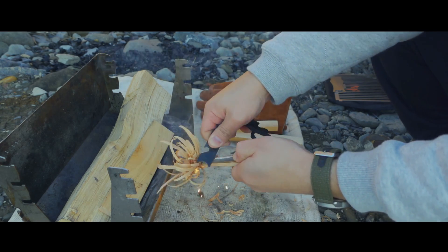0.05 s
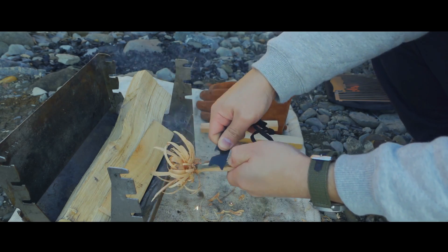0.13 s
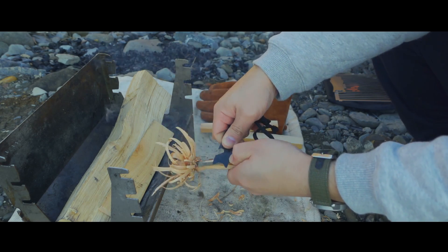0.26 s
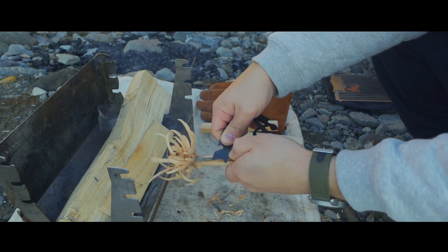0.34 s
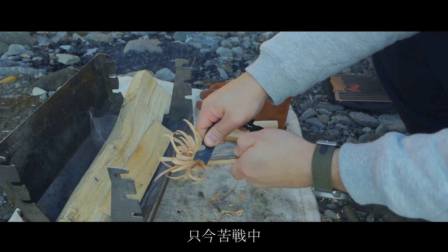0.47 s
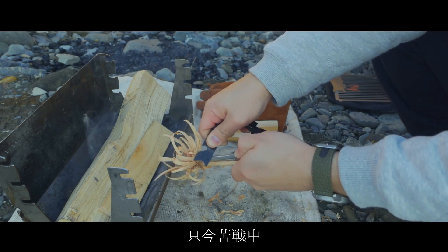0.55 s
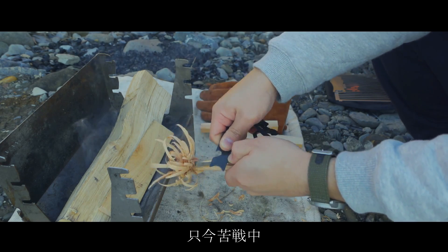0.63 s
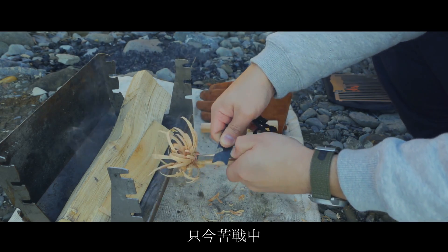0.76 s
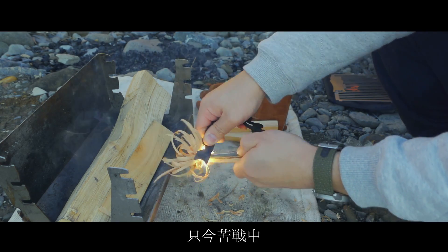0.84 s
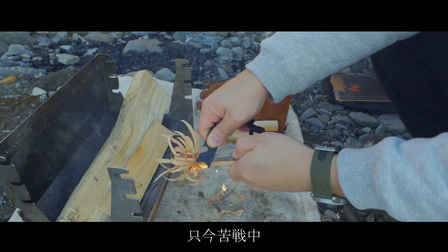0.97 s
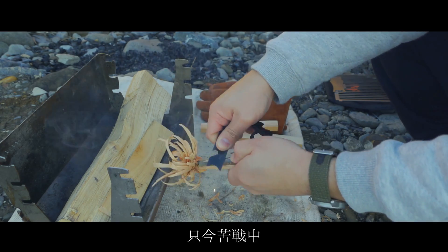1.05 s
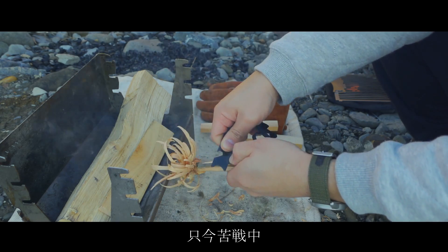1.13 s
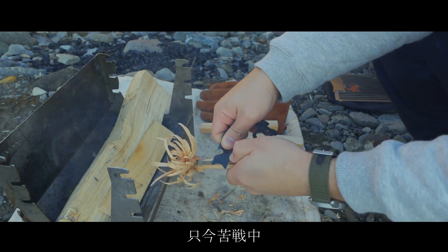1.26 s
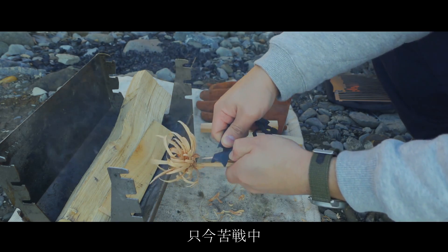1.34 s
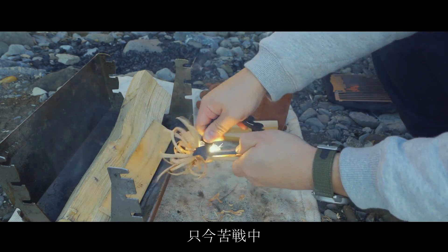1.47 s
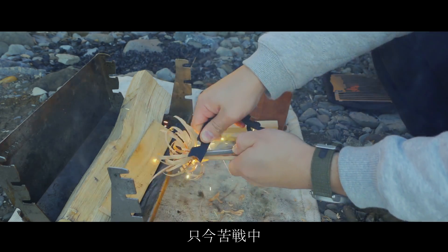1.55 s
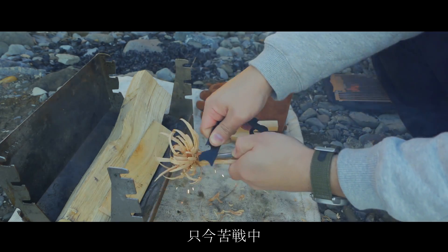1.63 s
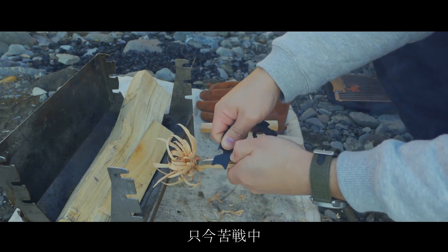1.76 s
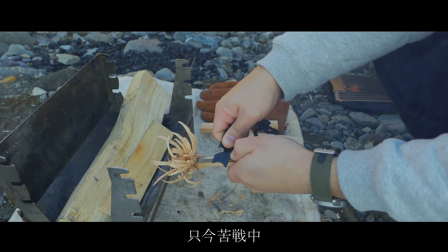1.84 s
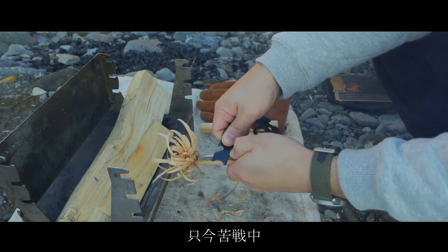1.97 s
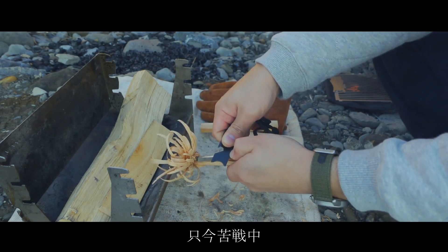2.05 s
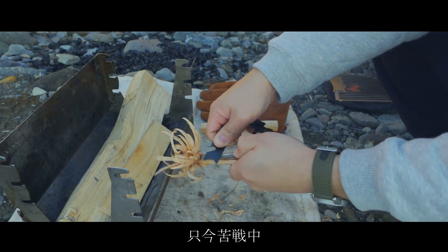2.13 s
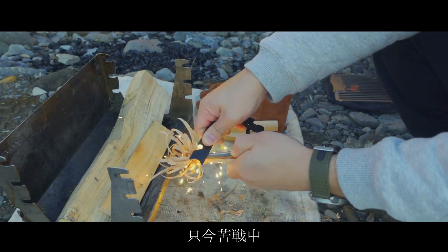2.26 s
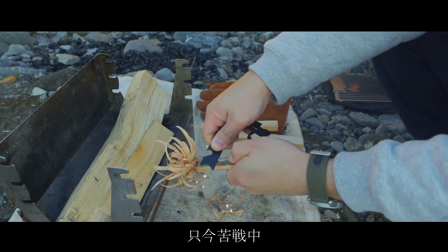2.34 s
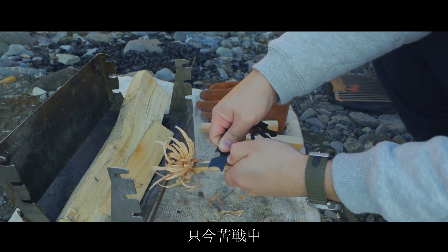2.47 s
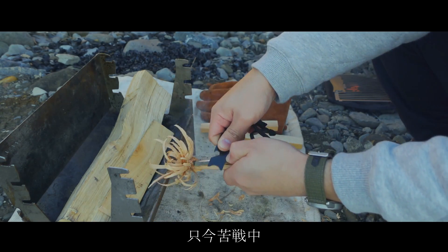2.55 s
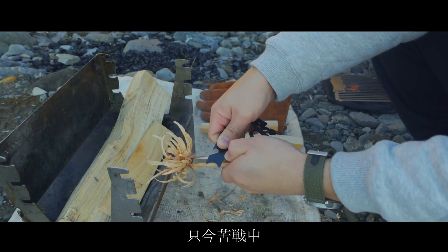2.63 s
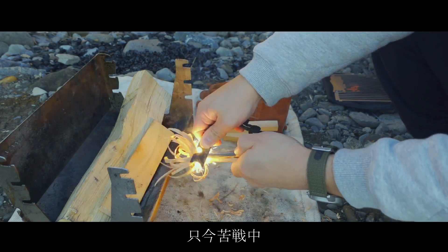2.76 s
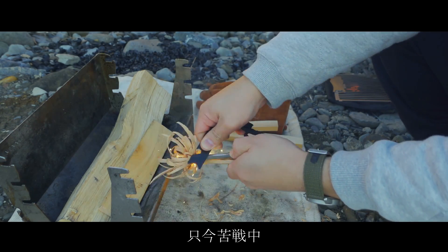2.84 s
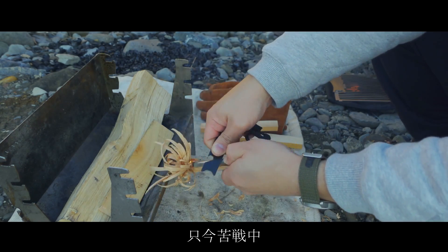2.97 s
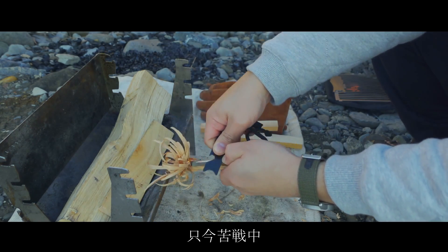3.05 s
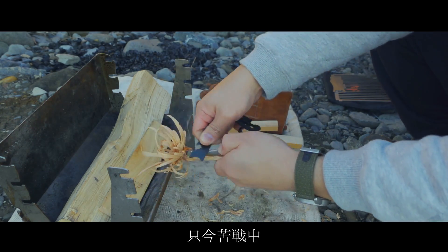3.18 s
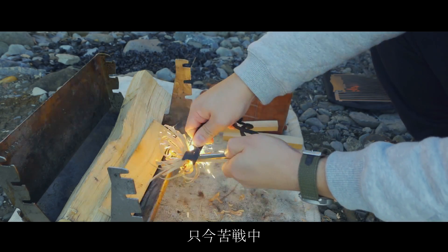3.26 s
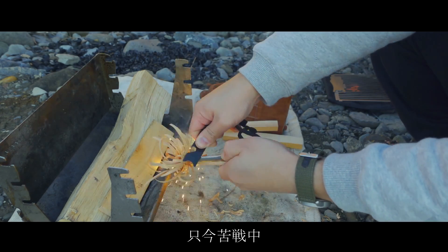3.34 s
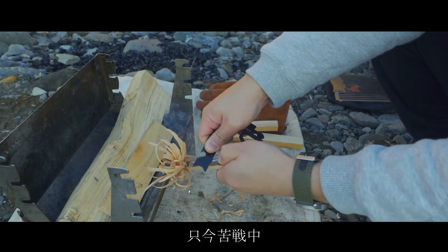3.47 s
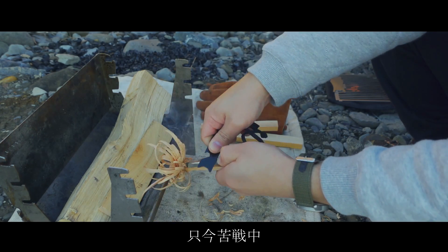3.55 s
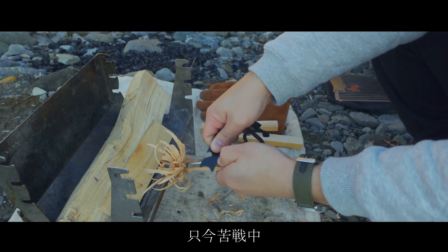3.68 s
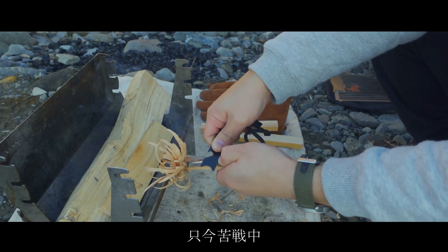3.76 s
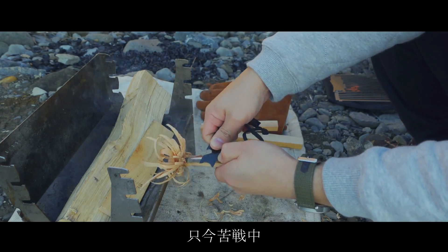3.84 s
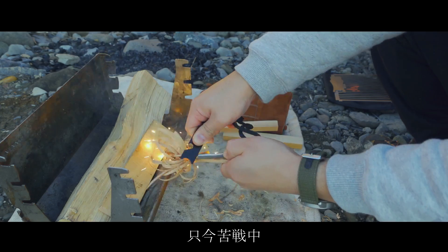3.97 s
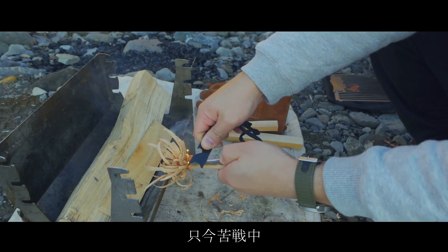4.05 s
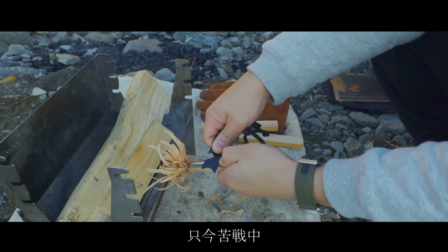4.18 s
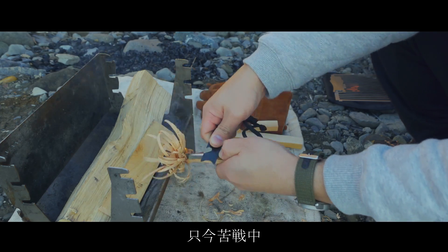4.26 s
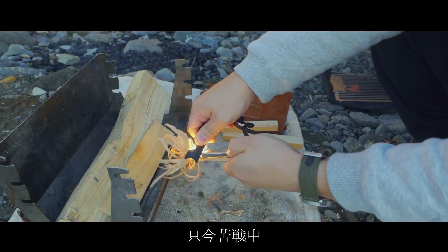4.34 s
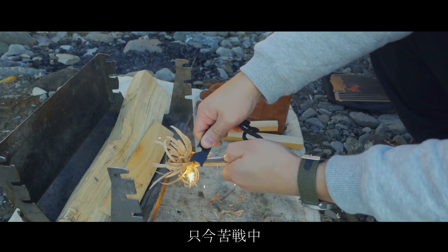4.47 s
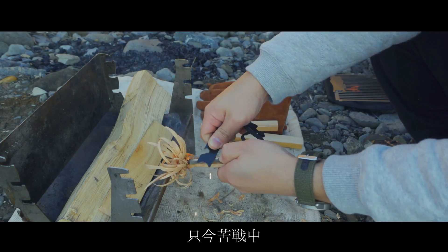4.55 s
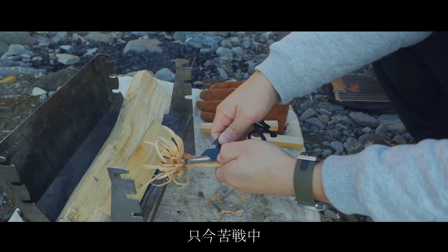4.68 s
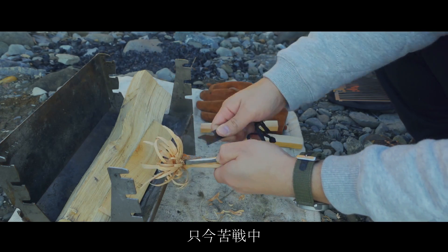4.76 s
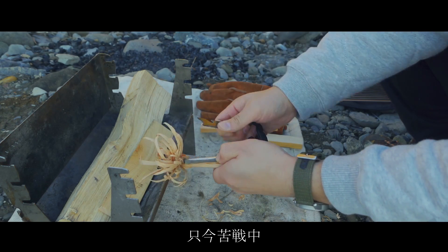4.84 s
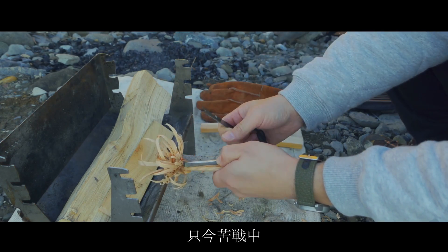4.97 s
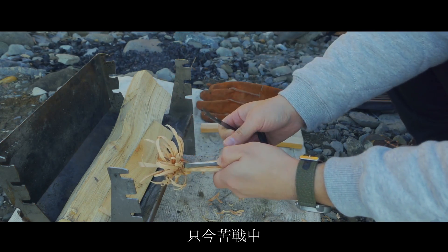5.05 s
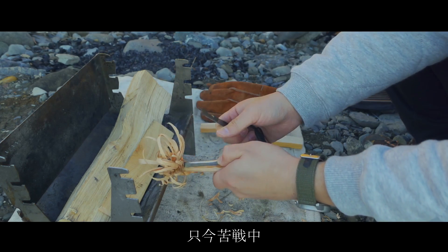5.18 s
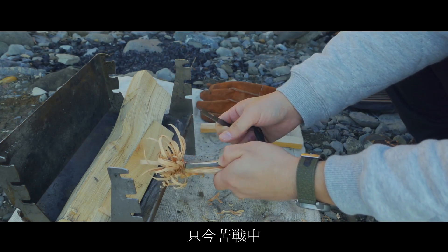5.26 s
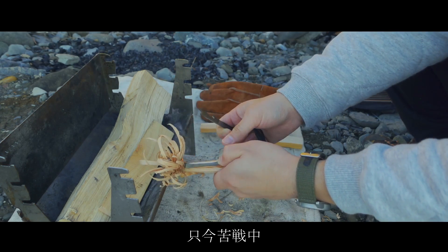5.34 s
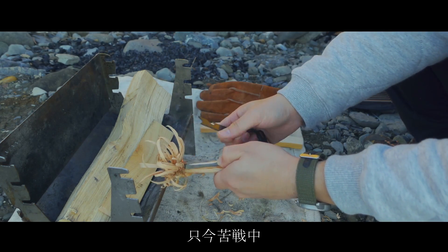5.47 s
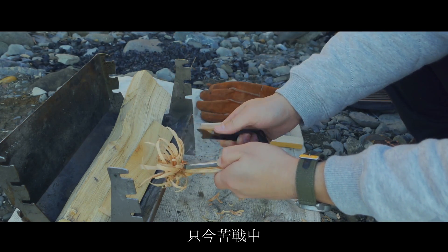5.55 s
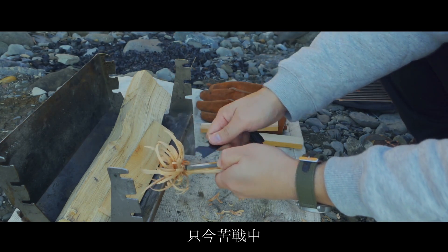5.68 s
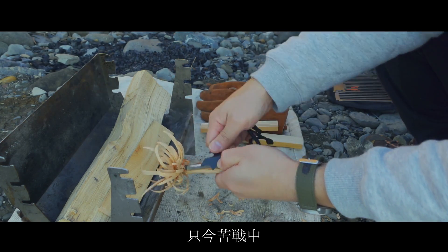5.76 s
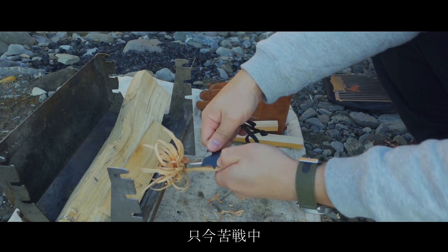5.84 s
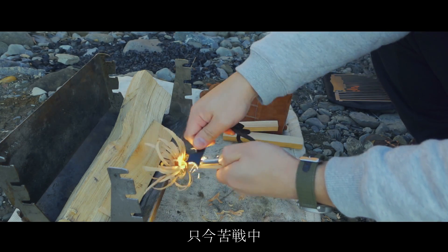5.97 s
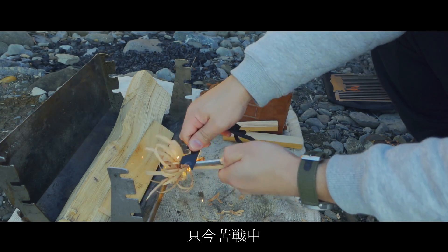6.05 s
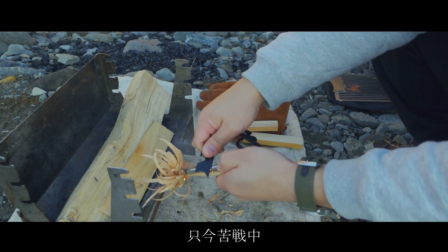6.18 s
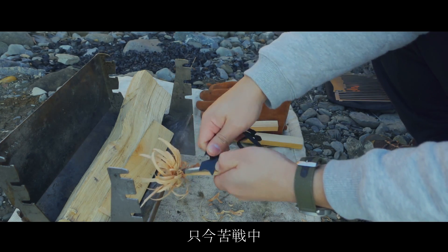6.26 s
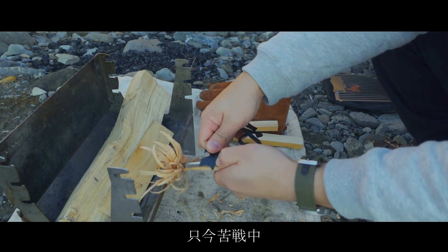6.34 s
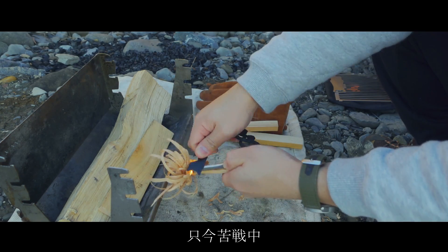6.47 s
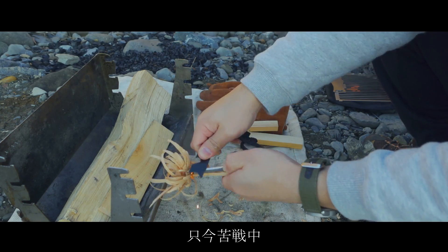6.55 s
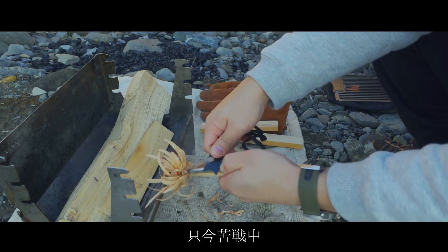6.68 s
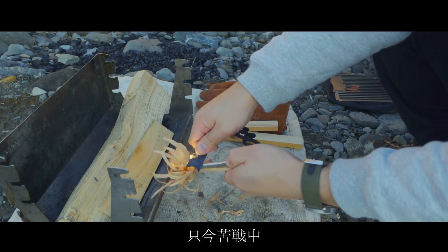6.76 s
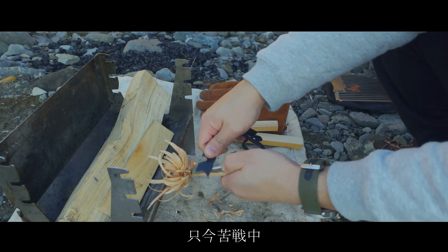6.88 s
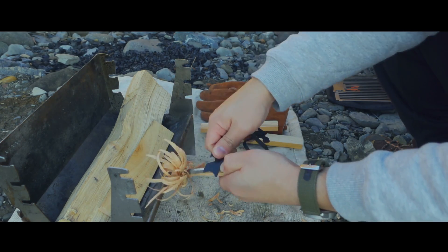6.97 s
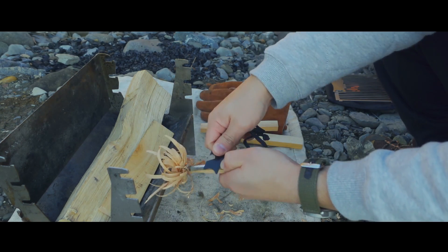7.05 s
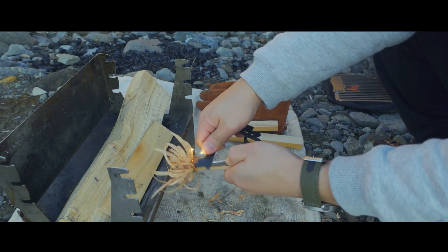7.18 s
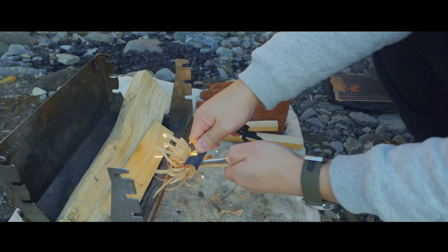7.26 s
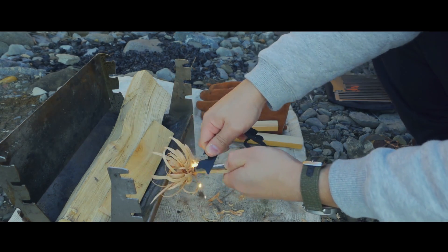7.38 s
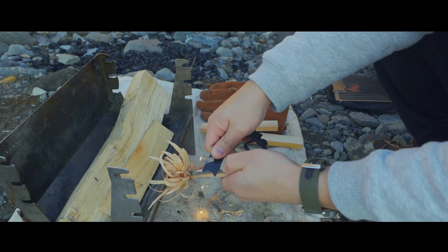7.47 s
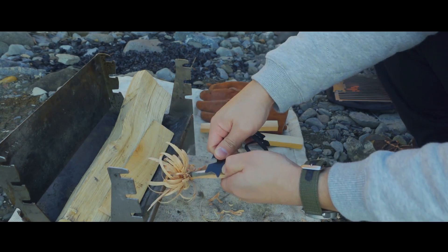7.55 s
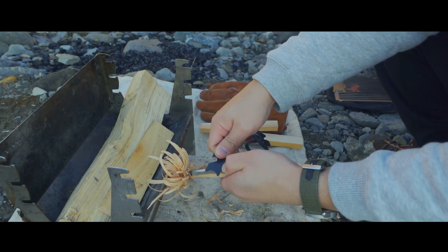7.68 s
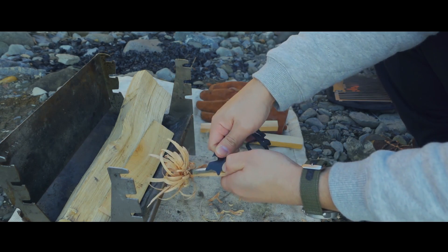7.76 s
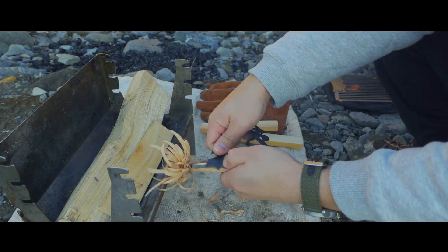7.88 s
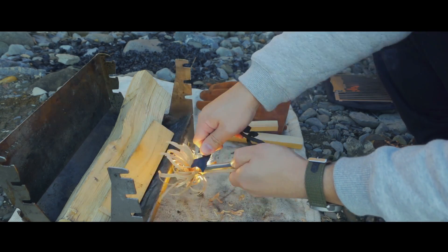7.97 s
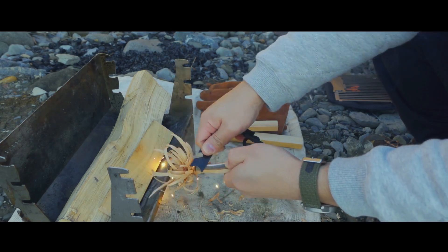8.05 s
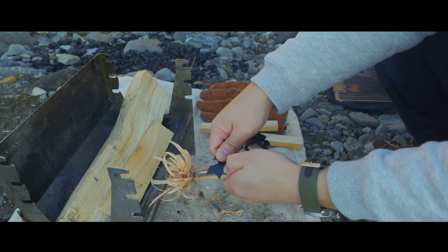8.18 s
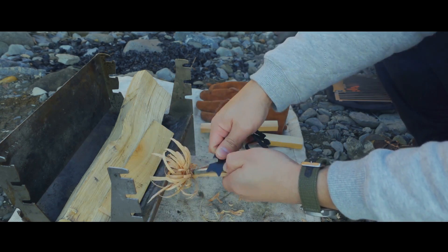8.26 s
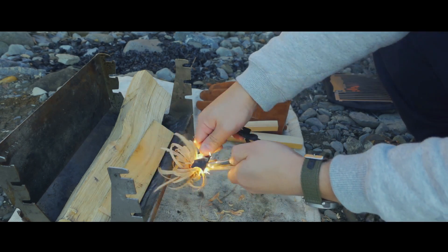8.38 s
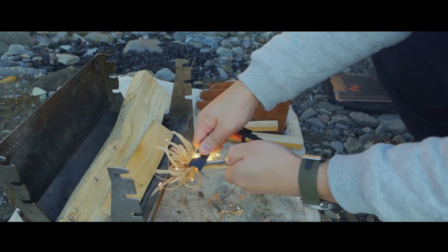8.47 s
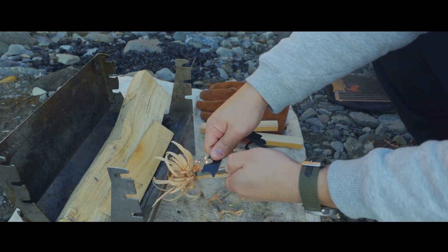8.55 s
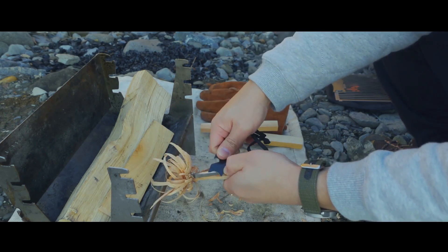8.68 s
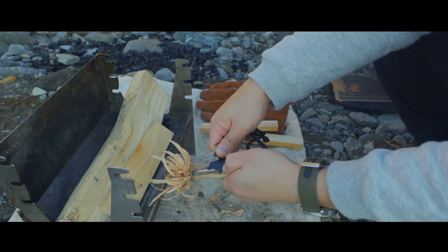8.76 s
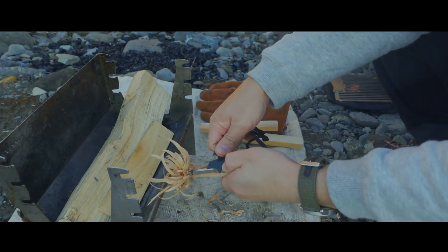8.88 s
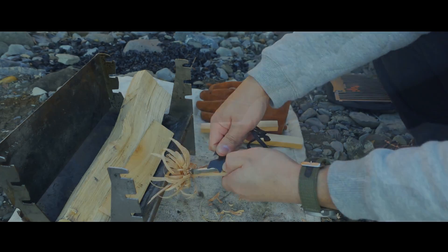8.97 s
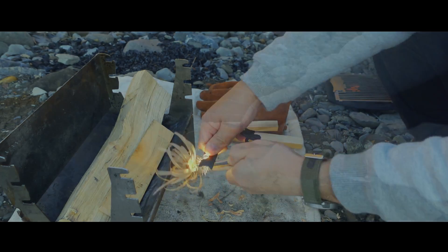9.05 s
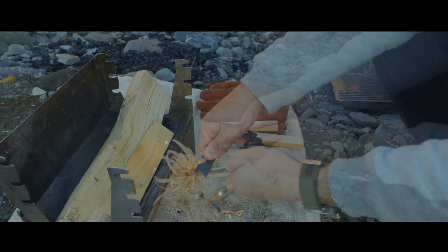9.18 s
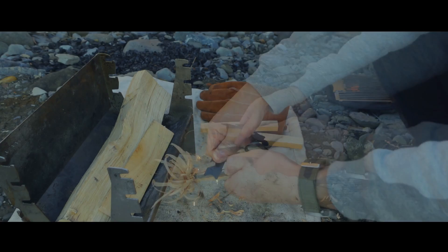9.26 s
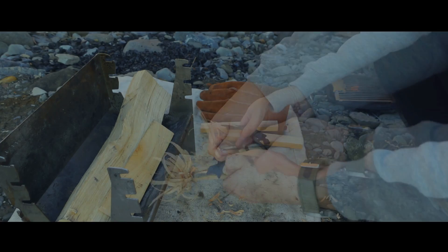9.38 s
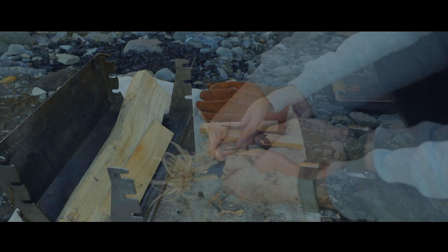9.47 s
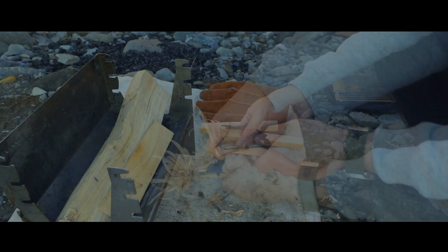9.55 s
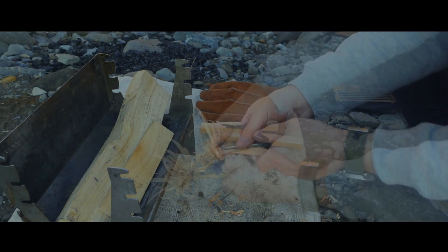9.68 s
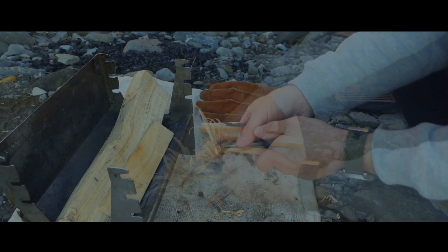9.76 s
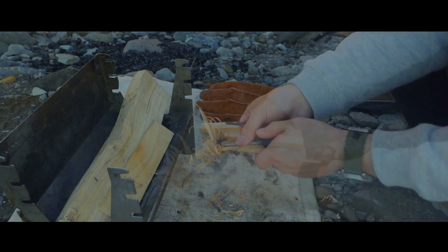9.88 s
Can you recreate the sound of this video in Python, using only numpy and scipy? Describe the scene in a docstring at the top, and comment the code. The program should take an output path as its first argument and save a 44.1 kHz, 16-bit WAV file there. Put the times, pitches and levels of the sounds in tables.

```python
"""A steel blade on a ferrocerium rod over wood shavings, straight ahead of a close microphone at a stony camp.
Water rushes far off throughout. A first flare is already dying when a drag opens a run of strokes: each push rasps
and most throw a fizzing flare of sparks, then the blade drags back with a thinner rasp. Halfway the hand pauses,
takes a new grip, sets the blade down with a click and strokes on; near the end the background is faded down a little.
Rasp is random slips through blade resonances, fire is dense random grains, and echoes answer from around."""
import sys
import numpy as np
from scipy import signal
from scipy.fft import rfft, irfft, next_fast_len
from scipy.io import wavfile
from scipy.ndimage import uniform_filter1d, map_coordinates

SR = 44100
rng = np.random.default_rng(int(sys.argv[2]) if len(sys.argv) > 2 else 0)


def materialize(psi):
    """Save the field psi as 16-bit PCM at rate SR to the path in sys.argv[1].

    A 1-D psi becomes a single channel; in a 2-D psi each row is a channel.
    """
    bounded = np.clip(np.atleast_2d(psi).T, -1, 1)
    quanta = np.round(bounded * 32767).astype(np.int16)
    wavfile.write(sys.argv[1], SR, quanta)


N = 437467
REGRIP_S = 5.3  # the second grip holds from here


def amp(db):
    """Decibels to gain."""
    return 10 ** (np.asarray(db) / 20)


def unit(x):
    """x at rms 1."""
    return x / np.sqrt(np.mean(x ** 2) + 1e-20)


def along(points, hz):
    """(Hz, value) points read on a log axis."""
    f, v = np.transpose(points)
    return np.interp(np.log(hz + 1), np.log(f + 1), v)


def wobble(rate):
    """A smooth random curve, rate knots a second."""
    knots = rng.standard_normal(int(N * rate / SR) + 4)
    return map_coordinates(knots, [np.arange(N) * rate / SR])


def grains(rate, scatter_db):
    """Impulses at random moments, about rate a second, of random sign and size."""
    size = amp(scatter_db * np.clip(rng.standard_normal(N), -2, 2))
    struck = rng.random(N) < rate / SR
    return struck * rng.choice([-1, 1], N) * size


def delayed(x, seconds):
    """x heard later by a steady or changing time."""
    return map_coordinates(x, [np.arange(N) - seconds * SR], order=3)


def add(track, s, part):
    """Mix part into track from s seconds on."""
    start = round(s * SR)
    track[max(start, 0):start + len(part)] += part[max(-start, 0):]


def causal(x, gain):
    """x through the causal minimum-phase filter whose size is gain(Hz)."""
    size = 4096
    cepstrum = irfft(np.log(gain(np.fft.rfftfreq(size, 1 / SR)) + 1e-6))
    # folding the cepstrum forward in time makes the response causal
    cepstrum[1:size // 2] *= 2
    cepstrum[size // 2 + 1:] = 0
    response = irfft(np.exp(rfft(cepstrum)))
    return signal.fftconvolve(x, response)[:N]


def coloured(x, spectrum):
    """x given a (Hz, dB) shape."""
    return causal(x, lambda hz: amp(along(spectrum, hz)))


def rung(x, modes):
    """x through steep resonances whose powers add."""
    def gain(hz):
        """Size of all resonances together; each is halved one half width from its centre."""
        peaks = [amp(db) / (1 + ((hz - centre) / width) ** 2) for centre, width, db in modes]
        return np.sqrt(sum(peak ** 2 for peak in peaks))

    return causal(x, gain)


def drifting(x, depth_db):
    """x with a colour that wanders in patches a few hundred Hz wide and some 40 ms long."""
    z = signal.stft(x, nperseg=256)[2]
    field = uniform_filter1d(rng.standard_normal(z.shape), size=3, axis=0)
    field = uniform_filter1d(field, size=15, axis=1)
    gain = amp(depth_db * unit(field))
    colour = np.mean(np.abs(z) ** 2, axis=1, keepdims=True)
    gain /= np.sqrt(np.sum(colour * gain ** 2, axis=0) / colour.sum())  # the loudness stays
    return signal.istft(z * gain, nperseg=256)[1][:N]


# colour of the far rush: (frequency [Hz], relative level [dB])
WATER_COLOUR = [(15, -72.5), (25, -42), (38, -43), (50, -19), (62, -13), (80, -11.5), (120, -10), (260, -3),
                (560, -6), (760, -10), (1800, -6), (3400, -10), (7000, -21.5), (15800, -37)]
# likeness of the rush at left and right: (frequency [Hz], correlation [0 to 1])
WATER_LIKENESS = [(30, .95), (80, 0.88), (180, 0.86), (330, 0.93), (600, 0.67), (1650, 0.92), (4970, 0.91),
                  (15000, 0.35)]
WATER_DB = -60  # rms before the slow wavering and the fade
FADE_S, FADE_LENGTH_S, FADE_DB = 9.1, 0.39, 3  # slight fade of the background towards the end


def water():
    """A far rush: slightly wavering noise, alike at left and right over much of its range."""
    hz = np.fft.rfftfreq(N, 1 / SR)
    turn = np.arccos(np.clip(along(WATER_LIKENESS, hz), -1, 1)) / 2  # shares out mid and side
    shape = amp(along(WATER_COLOUR, hz)) * [np.cos(turn), np.sin(turn)]
    mid, side = irfft(rfft(rng.standard_normal((2, N))) * shape, N)
    fade = np.clip((np.arange(N) / SR - FADE_S) / FADE_LENGTH_S, 0, 1)
    level_db = WATER_DB - FADE_DB * fade + 1.13 * wobble(7.9)
    return unit(np.array([mid + side, mid - side])) * amp(level_db)


def echo(x, t60, width):
    """A diffuse stereo answer, one second of noise in which each frequency dies at its own speed."""
    hz, t, z = signal.stft(rng.standard_normal((2, SR)), SR, nperseg=256)
    decay = amp(-60 * t / along(t60, hz)[:, None])
    tail = signal.istft(z * decay, SR, nperseg=256)[1]
    mid, side = signal.fftconvolve(x[None], tail / np.linalg.norm(tail[0]), axes=1)[:, :N]
    return np.array([mid + width * side, mid - width * side])


# echo of the far bank: (frequency [Hz], time to die by 60 dB [s])
BANK_T60 = [(200, 0.47), (2000, 2.5), (4500, 3.1), (6000, 1.47), (10000, .5), (16000, 0.18)]
# colour of what reaches the bank: (frequency [Hz], level [dB])
BANK_COLOUR = [(1000, 0), (3000, 2), (6000, -4.5), (12000, 0)]


def off_bank(near):
    """The far bank answers faintly, with a long tail."""
    return amp(-24.5) * echo(coloured(near, BANK_COLOUR), BANK_T60, width=0.25)


def off_stones(near):
    """The stove and stones answer with a short tail, equally short at all frequencies."""
    return amp(-37) * echo(near, [(1000, 0.044)], width=0.25)


def off_table(near):
    """The board under the hands returns a copy whose path changes as they move, a little different at each ear."""
    path_s = .00176 + .00013 * wobble(6)
    between_ears_s = .000009  # earlier at left, later at right
    left = delayed(near, path_s - between_ears_s)
    right = delayed(near, path_s + between_ears_s)
    return amp(-13) * np.array([left, right])


# a big shower pushes the air: (time [s], relative level [dB])
PUFFS = [(0.93, -66), (1.55, -54.5), (2.24, -62.5), (2.82, -61), (3.31, -63.5), (3.98, -64), (4.4, -65),
         (6.07, -60.5), (7.27, -66), (7.999, -71), (9.13, -68)]
# colour of that breath: (frequency [Hz], relative level [dB])
PUFF_COLOUR = [(20, -72), (50, -42), (90, -25), (135, -5.5), (180, -3), (260, -1.5), (500, -25),
               (1500, -46), (4000, -80)]


def puffs():
    """The hot gas of a shower swells out in a soft low breath of noise."""
    t = np.arange(N) / SR
    swell = sum(amp(db) * np.exp(-((t - s) / 0.036) ** 2) for s, db in PUFFS)
    return amp(4.5) * swell * unit(coloured(rng.standard_normal(N), PUFF_COLOUR))


# the blade is set on the rod or rebounds from it: (time [s], level [dB])
SET_DOWN = [(2.561, -40), (2.583, -51), (4.8597, -42.5), (5.781, -15), (5.7825, -25.5), (5.785, -29)]
# resonances of blade and rod lightly touching: (frequency [Hz], half width [Hz], level [dB])
TOUCHING = [(1570, 320, -19), (2740, 300, -24), (3600, 180, -9), (4320, 160, -3.5), (4930, 240, -3.5),
            (5940, 510, -0.5), (7320, 400, -14), (8600, 550, -23), (11800, 2100, -27.5)]


def set_down():
    """Each light contact is a single impulse that rings blade and rod."""
    blow = np.zeros(N)
    for s, db in SET_DOWN:
        blow[round(s * SR)] = amp(db)
    one_contact = rung(signal.unit_impulse(N), TOUCHING)
    return rung(blow, TOUCHING) / np.abs(one_contact).max()


# single sparks burst: (time [s], relative level [dB])
POPS = [(0.0519, -28.5), (2.358, -19.5), (4.4766, -18), (4.8584, -43), (6.237, -18), (6.578, -35),
        (8.6011, -37), (9.537, -47)]
# colour of a bursting spark: (frequency [Hz], level [dB])
POP_COLOUR = [(200, -29), (1100, -11), (3000, 6.5), (6000, 3.5), (9000, 0), (16000, -5.5)]


def pops():
    """A larger spark bursts in a short broad crackle of dying noise."""
    out, t = np.zeros(N + SR), np.arange(SR // 20) / SR
    for s, db in POPS:
        burst = amp(db - 9.0 - 60 * t / 0.015) * rng.standard_normal(len(t))
        add(out, s, burst)
    return coloured(out[:N], POP_COLOUR)


# the edge catches and slips: (time [s], level [dB], ring [Hz])
CATCHES = [(0.429, -25.5, 7140), (0.474, -18, 6860), (0.635, -11.5, 5590), (0.6702, -11, 6000),
           (0.839, -17.5, 6530), (0.8738, -12, 6060), (1.131, -25, 6330), (2.387, -18.5, 5950),
           (2.4578, -34.5, 6000), (4.0294, -18, 6170), (4.119, -22.5, 5187), (6.414, -25.5, 4306),
           (6.6836, -23, 4370), (7.186, -26, 4320)]


def catches():
    """The edge snags and lets go: the hand-damped blade rings for a millisecond or two."""
    out, t = np.zeros(N + SR), np.arange(SR // 40) / SR
    swell = (t / .00045) ** 2 * np.exp(-t / 0.00025)
    chatter_band = signal.butter(2, [3500, 7500], "band", fs=SR)
    for s, db, hz in CATCHES:
        ring = swell / swell.max() * np.sin(2 * np.pi * hz * t)
        band_noise = signal.lfilter(*chatter_band, rng.standard_normal(len(t)))
        chatter = .16 * amp(-60 * t / 0.015) * band_noise
        crack = .05 * amp(-60 * t / 0.0031) * rng.standard_normal(len(t))
        add(out, s, amp(db) * (ring + chatter + crack))
    return out[:N]


FIRST_ZING_RATIO, SECOND_ZING_RATIO = 2.16, 2.24  # upper ring over the main one, in each grip


def zing(ring_hz):
    """The blade's narrow upper ring, gliding with its main one: a carrier under random modulation."""
    ratio = np.where(np.arange(N) < REGRIP_S * SR, FIRST_ZING_RATIO, SECOND_ZING_RATIO)
    phase = 2 * np.pi * np.cumsum(ratio * ring_hz * (1 + .015 * wobble(25))) / SR
    return unit(wobble(900) * np.cos(phase) + wobble(900) * np.sin(phase))


# a shower of shavings catches fire:
# (time of full blaze [s], relative flare level [dB], relative fizz level [dB], hold [s], time to die by 60 dB [s])
SHOWERS = [(0.0, -52, -58.5, .003, 0.34), (0.525, -59.5, -60.5, .004, .12), (0.653, -65, -48.5, 0.019, .04),
           (0.907, -39.5, -42, .008, 0.46), (1.53, -39.5, -40.5, 0.027, 0.24),
           (2.225, -41.5, -43.5, 0.05, 0.27), (2.8, -42.5, -41.5, .03, 0.114),
           (2.875, -48.5, -52, .003, .25), (2.967, -60.5, -56.5, .01, .3), (3.263, -42.5, -44, 0.076, 0.22),
           (3.962, -38, -40, 0.0074, .37), (4.392, -41.5, -42, .012, 0.49),
           (6.036, -40.5, -46.5, .012, 0.25), (6.108, -52, -51, .025, 0.21),
           (6.813, -54, -51.5, 0.026, 0.27), (7.258, -45.5, -50.5, .04, 0.19),
           (7.359, -46.5, -47, 0.0041, 0.096), (7.405, -50.5, -54.5, 0.0043, 0.14),
           (8.001, -44, -44, .036, 0.26), (8.424, -42.5, -43.5, .04, 0.44),
           (9.132, -43, -41.5, 0.019, 0.28), (9.271, -55.5, -60, .012, 0.121)]
KINDLE_FLARE_S, KINDLE_FIZZ_S = 0.023, 0.034  # time to catch fire; the fizz builds a little ahead of the flare
EMBER_DB, EMBER_T60_S = -12.5, 0.88  # afterglow, against the flare
SMOULDER_DB = -15.5  # breathy part of the scrapings, against their fizz


def burning(scrapings):
    """Flare and fizz in dB: each shower kindles, blazes, dies down and glows on, over the fizz of the scrapings."""
    t = np.arange(SR) / SR - .1  # seconds from full blaze
    flare_rise = np.exp(-(np.minimum(t, 0) / KINDLE_FLARE_S) ** 2)
    fizz_rise = np.exp(-(np.minimum(t, 0) / KINDLE_FIZZ_S) ** 2)
    flare, fizz = np.zeros((2, N + SR))  # powers
    for s, flare_db, fizz_db, hold_s, t60 in SHOWERS:
        dying_s = np.maximum(t - hold_s, 0)
        blaze = amp(-60 * dying_s / t60)
        embers = amp(EMBER_DB - 60 * dying_s / EMBER_T60_S)
        add(flare, s + t[0], (amp(flare_db) * flare_rise * np.maximum(blaze, embers)) ** 2)
        add(fizz, s + t[0], (amp(fizz_db) * fizz_rise * blaze) ** 2)
    flare_power = flare[:N] + (amp(SMOULDER_DB) * scrapings) ** 2
    fizz_power = fizz[:N] + scrapings ** 2
    return 10 * np.log10(np.array([flare_power, fizz_power]) + 1e-12)


# colour of the breathy flare: (frequency [Hz], relative level [dB])
FLARE_COLOUR = [(25, -57), (60, -38), (130, -22), (200, -12), (400, -15.5), (700, -18), (900, -6.5),
                (1130, 1), (1450, -3.5), (2100, 2.5), (2500, 1), (3000, 0), (3600, 1.5), (4500, 2),
                (6000, -7.5), (9000, -12), (16000, -26)]
# colour of the fizz: (frequency [Hz], relative level [dB])
FIZZ_COLOUR = [(1000, -22), (2500, -8), (4200, 2.5), (7300, 9), (8600, 3.5), (10500, -1), (12000, -3),
               (13300, -2.5), (14500, -5.5), (16000, -3.5)]
ZING_SHARE = 0.23  # most of the treble's power that can be the blade's own ring


def sparks(scrapings, ring_hz):
    """Shavings catch fire: a breathy flare under a dense fizz of tiny bursts."""
    flare_db, fizz_db = burning(scrapings)
    flare_flicker = amp(1.7 * wobble(110) + 0.92 * wobble(30))
    flare = coloured(grains(rate=3500, scatter_db=5) * flare_flicker, FLARE_COLOUR)
    fizz = coloured(grains(rate=7000, scatter_db=8.0) * amp(2.6 * wobble(160)), FIZZ_COLOUR)
    flare = unit(drifting(flare, depth_db=1.6))
    fizz = unit(drifting(fizz, depth_db=2.8))
    # while the edge bites and little burns yet, part of the treble is the blade's own ring
    bite = ZING_SHARE / (1 + amp(flare_db - fizz_db + 6.5) ** 2)
    treble = amp(4.0) * np.sqrt(1 - bite) * fizz + np.sqrt(bite) * zing(ring_hz)
    return amp(flare_db + 5.0) * flare + amp(fizz_db) * treble


BITE_S, LIFT_T60_S = 0.00582, .016  # the edge takes hold; it lifts off


def stroke(t, rise_s, fall_s, swell_db, fade_db):
    """Gain of one scrape: the edge bites, the pressure builds and eases, the edge lifts off."""
    pressure_db = np.interp(t, [0, rise_s, rise_s + fall_s], [-swell_db, 0, -fade_db])
    lift_db = -60 * np.maximum(t - rise_s - fall_s, 0) / LIFT_T60_S
    return np.minimum(t / BITE_S, 1) * amp(pressure_db + lift_db)


# the edge is pushed down the rod: (time [s], rise [s], fall [s], relative rasp level [dB],
# fade over the fall [dB], nominal ring [Hz], relative fizz level of the scrapings [dB])
PUSHES = [(0.419, 0.054, .022, -32, 1.5, 6282, -45), (0.829, 0.05, .085, -33, 17, 6170, -44),
          (1.462, 0.061, 0.078, -34, 21, 6050, -47), (2.166, 0.045, 0.096, -36.5, 6.5, 6120, -44),
          (2.736, 0.047, 0.057, -33, 15, 6050, -45.5), (3.213, 0.047, 0.12, -36, 12, 6084, -41.5),
          (3.902, .035, 0.076, -36, 12, 6280, -43.5), (4.317, .012, .026, -36.5, 4, 6350, -46.5),
          (4.358, .02, .075, -36, 12, 6170, -46.5), (5.985, .044, 0.047, -39, 14.5, 6176, -39.5),
          (6.399, .015, 0.028, -37.5, 6, 5790, -50), (6.454, .006, .014, -35.5, 9, 5730, -43),
          (6.476, 0.011, 0.0227, -34.5, 14, 5720, -40), (6.729, .01, .04, -38.5, 1.5, 5743, -50.5),
          (6.784, 0.0212, .07, -34.5, 21, 5690, -41.5), (7.171, .013, 0.038, -38, 6, 6030, -48),
          (7.231, 0.0082, 0.074, -39, 10, 5880, -37.5), (7.939, 0.049, 0.096, -38, 10.5, 5960, -42),
          (8.367, 0.012, 0.15, -37, 10, 5950, -46), (9.059, 0.0095, 0.12, -42, 4, 5650, -51)]
# the blade drags back along it: (time [s], rise [s], fall [s], relative rasp level [dB],
# fade over the fall [dB], nominal ring [Hz])
DRAGS = [(0.068, 0.072, 0.072, -36, 0, 5754), (0.605, .018, .058, -33, 0, 5720),
         (0.808, 0.0053, 0.0077, -44.5, 4, 5966), (0.96, 0.065, .114, -36, 6.5, 5770),
         (1.155, 0.027, 0.0152, -49.5, 5.5, 5560), (1.61, 0.094, 0.0509, -34, 14.5, 5860),
         (1.75, 0.048, 0.025, -46.5, 7, 5780), (2.305, 0.067, 0.11, -38, 1.5, 5807),
         (2.853, 0.019, 0.0605, -45.5, 6, 5770), (2.932, 0.029, .097, -36.5, 15, 5790),
         (3.39, 0.077, 0.0612, -37.5, 21.5, 5820), (3.525, 0.028, 0.0351, -50, 4.5, 5930),
         (4.018, .018, 0.0595, -35.5, 5, 5796), (4.085, 0.058, 0.054, -34.5, 5.5, 5917),
         (4.46, 0.061, .125, -38, 1.5, 5710), (4.65, 0.052, 0.0548, -55.5, 12.5, 5830),
         (6.08, 0.051, 0.05575, -41, 4, 5520), (6.183, 0.027, .094, -37, 16, 5437),
         (6.59, .085, 0.0188, -38.5, 0.5, 5400), (6.888, 0.052, 0.0493, -34.5, 5.5, 5577),
         (7.323, 0.025, .07, -43, 4.5, 5682), (7.422, 0.019, 0.041, -39.5, 14.5, 5370),
         (7.478, 0.01436, 0.077, -53, 3, 5560), (8.085, 0.054, .1, -38.5, 8.5, 5460),
         (8.24, .012, 0.061, -58, 8, 5410), (8.525, 0.049, 0.046, -37.5, 11, 5390),
         (8.622, 0.023, .087, -45.5, 14.5, 5460), (9.19, 0.06, .038, -39.5, 2, 5440),
         (9.335, 0.034, 0.032, -54, 5, 5550)]
PUSH_SWELL_DB, DRAG_SWELL_DB = 7.5, 11  # growth of the rasp from first contact to full pressure
# the nominal ring sags towards the rod's tip and climbs on the way back
PUSH_GLIDE_HZ_PER_S, DRAG_GLIDE_HZ_PER_S = -3200, 1500
REST_HZ = 5800  # nominal ring of the blade between strokes
DRAG_FIZZ_DB = -29.5  # fizz of a drag, against its rasp


def hand():
    """All pushes and drags: level of the rasp, nominal ring of the blade in Hz, level of the scrapings' fizz."""
    t = np.arange(SR // 3) / SR
    power, detune, scrapings = np.zeros((3, N + SR))
    pushes = [(*row, PUSH_SWELL_DB, PUSH_GLIDE_HZ_PER_S) for row in PUSHES]
    drags = [(*row, row[3] + DRAG_FIZZ_DB, DRAG_SWELL_DB, DRAG_GLIDE_HZ_PER_S) for row in DRAGS]
    for s, rise_s, fall_s, db, fade_db, hz, fizz_db, swell_db, glide in pushes + drags:
        gain = stroke(t, rise_s, fall_s, swell_db, fade_db)
        rasp_power = (amp(db) * gain) ** 2
        shift_hz = hz + glide * np.maximum(t - rise_s, 0) - REST_HZ
        add(power, s, rasp_power)
        add(detune, s, rasp_power * shift_hz)
        add(scrapings, s, (amp(fizz_db) * gain) ** 2)
    ring_hz = REST_HZ + detune / (power + 1e-12)  # overlapping strokes share the ring by power
    return np.sqrt(power[:N]), ring_hz[:N], np.sqrt(scrapings[:N])


# resonances of blade and rod in the first grip: (frequency [Hz], half width [Hz], relative level [dB])
FIRST_GRIP = [(1940, 550, -24), (2820, 180, -15.5), (3780, 320, -32), (5024, 670, -3.5), (6200, 302, 3),
              (6580, 210, -1), (8480, 400, -34), (11600, 230, -30.5), (12750, 400, -30), (15170, 2680, -42)]
# the same in the second grip: (frequency [Hz], half width [Hz], relative level [dB])
SECOND_GRIP = [(1801, 1215, -41), (3093, 250, 1.5), (4330, 900, -5.5), (5080, 600, -3.5), (6420, 560, 2.5),
               (7100, 240, -10.5), (8800, 440, -32), (12900, 500, -18), (13994, 4000, -35)]


def rasp(level, ring_hz):
    """Tiny slips of the edge ring the blade; the ring shifts as the contact moves along it."""
    roughness = amp(1.5 * wobble(220) + 0.67 * wobble(60) + 0.93 * wobble(28))
    slips = grains(rate=4000, scatter_db=5) * roughness
    first = np.arange(N) < REGRIP_S * SR
    # reading the ringing faster or slower raises or lowers it
    speed = np.where(first, (ring_hz / 5800) ** .85, (ring_hz / 5550) ** .45)
    place = [np.cumsum(speed)]

    def held(grip, round_trip_s):
        """Each slip returns inverted from the fingers, which cuts notches between the resonances."""
        waves = slips - .55 * delayed(slips, round_trip_s)
        ring = map_coordinates(rung(waves, grip), place, order=5, mode="wrap")
        return unit(drifting(ring, depth_db=2.8))

    first_ring = amp(0.3) * held(FIRST_GRIP, round_trip_s=0.0004566)
    second_ring = amp(0.75) * held(SECOND_GRIP, round_trip_s=0.0003024)
    return level * np.where(first, first_ring, second_ring)


def scene():
    """The fire starter straight ahead, answered by the board, the stove and stones, and faintly by the far bank."""
    level, ring_hz, scrapings = hand()
    near = rasp(level, ring_hz) + sparks(scrapings, ring_hz) + puffs() + catches() + set_down() + pops()
    stones = off_stones(near)
    bank = off_bank(near)
    return amp(-0.3) * (near + off_table(near)) + stones + bank + water()


TOP_HZ = 15850  # upper band limit


def record(dry):
    """The microphone's recorder keeps nothing above its band limit."""
    size = next_fast_len(N + SR // 2)
    kept = np.fft.rfftfreq(size, 1 / SR) < TOP_HZ
    return irfft(rfft(dry, size) * kept, size)[:, :N]


dry = scene()
out = record(dry)
materialize(out)
```